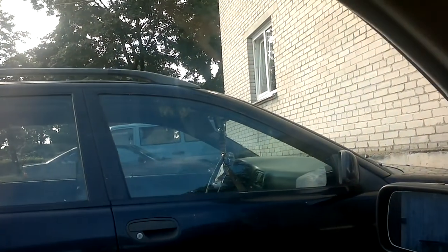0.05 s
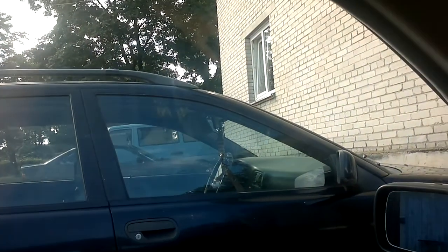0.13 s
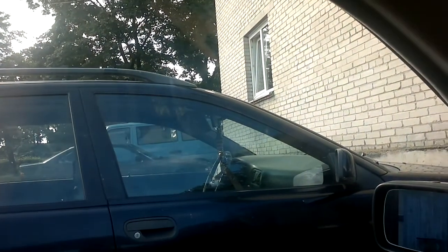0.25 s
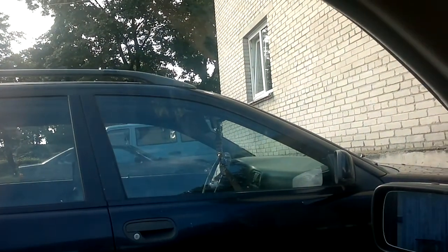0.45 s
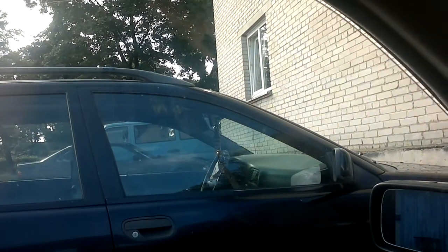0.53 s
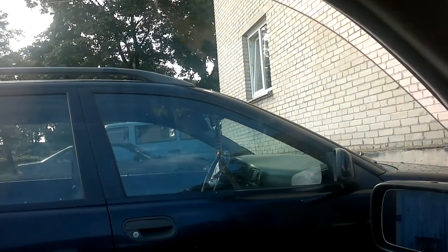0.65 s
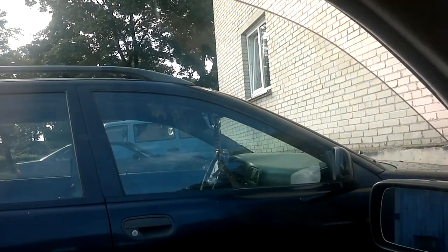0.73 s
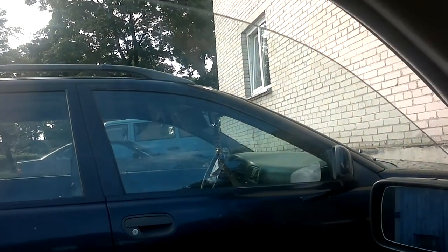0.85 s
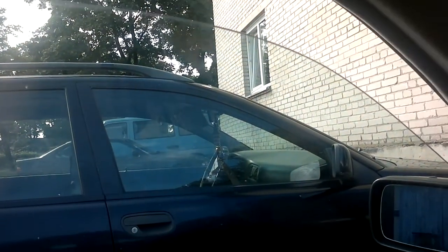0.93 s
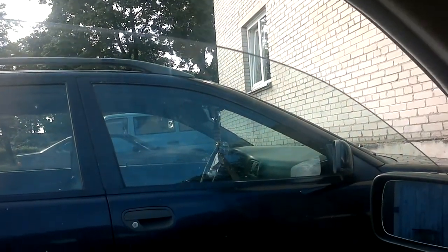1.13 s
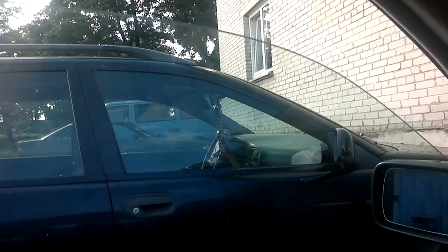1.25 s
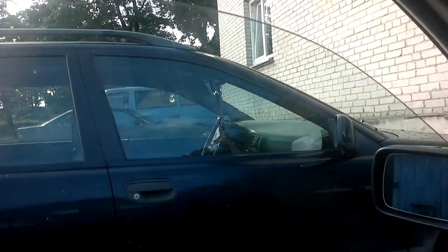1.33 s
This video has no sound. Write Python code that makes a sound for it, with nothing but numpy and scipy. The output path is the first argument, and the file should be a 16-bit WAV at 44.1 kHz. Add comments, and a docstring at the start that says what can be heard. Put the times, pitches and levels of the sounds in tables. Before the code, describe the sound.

A power window slides down, heard from the seat inside a parked car. A switch clicks at about 0.2 seconds, and at 0.3 the glass breaks loose from its rubber seal with a loud thunk. A small electric motor hums and whines steadily while the pane rubs along its channel. Just after 1 second it stops with a light knock and a brief door shudder, leaving faint outdoor background.

```python
"""A power window slides down, heard inside a parked car: a whir of shaft hum, commutator whine and gears,
with glass rubbing along its felt channel. A finger presses the switch, a relay clicks, the motor takes
up the slack and the pane cracks loose from its rubber seal with a thunk. The motor stops with a knock,
the door settles, and a quiet outdoor background remains."""
import sys
import numpy as np
from scipy import signal
from scipy.fft import rfft, irfft
from scipy.io import wavfile

SR = 44100
rng = np.random.default_rng(int(sys.argv[2]) if len(sys.argv) > 2 else 0)


def unload_audio(sound):
    """Save the sound as a 16-bit wav file, at the path given as the first command line argument."""
    columns = np.transpose(np.atleast_2d(sound))
    # keep every value between -1 and 1, then stretch to whole-number steps
    steps = np.round(np.clip(columns, -1, 1) * 32767)
    wavfile.write(sys.argv[1], SR, steps.astype(np.int16))


N = 61739


def undb(db):
    """Decibels to gain."""
    return 10 ** (np.asarray(db) / 20)


def clock():
    """Time of every sample in seconds."""
    return np.arange(N) / SR


def curve(rows):
    """Join (time_s, value) points by straight lines."""
    return np.interp(clock(), *np.array(rows).T)


def unit(x):
    """Scale to rms 1."""
    return x / np.sqrt(np.mean(x ** 2))


def noise(colour):
    """Noise of rms 1, shaped by (freq_hz, relative_db) points and rolled off below 20 Hz."""
    hz, db = np.array(colour).T
    f = np.arange(N // 2 + 1) * SR / N + 1
    gain = undb(np.interp(np.log(f), np.log(hz), db)) * np.minimum(f / 20, 1) ** 2
    return unit(irfft(rfft(rng.standard_normal(N)) * gain, N))


def drift(rate_hz):
    """Smooth random motion of rms 1, up to about the given rate."""
    f = np.arange(N // 2 + 1) * SR / N
    return unit(irfft(rfft(rng.standard_normal(N)) * np.exp(-(f / rate_hz) ** 2) * (f > 0), N))


def tone(turns):
    """Sine of rms 1 with a random starting phase."""
    return np.sqrt(2) * np.sin(2 * np.pi * (turns + rng.random()))


def waver(hz, wobble, rate_hz):
    """A tone whose pitch wanders by a share of itself."""
    return tone(np.cumsum(hz * (1 + wobble * drift(rate_hz))) / SR)


def fade(t60_s, hold_s=0):
    """Hold at full level, then decay exponentially."""
    return np.exp(-np.log(1000) * np.maximum(clock() - hold_s, 0) / t60_s)


def swell(rise_s, t60_s):
    """A smooth attack and an exponential decay."""
    return np.sin(np.pi / 2 * np.minimum(clock() / rise_s, 1)) ** 2 * fade(t60_s, hold_s=rise_s)


def at(start_s, x):
    """Delay a sound to its starting time."""
    return np.concatenate([np.zeros(int(start_s * SR)), x])[:N]


def strikes(hits, modes, tail_colour, tail_t60_s, tail_db):
    """Hits on one object: ringing modes and a noisy tail, duller for softer contact."""
    t, out = clock(), np.zeros(N)
    ring_rms = np.sqrt(sum(undb(db) ** 2 for _, db, _ in modes) / 2)
    for start_s, level_db, brightness_hz in hits:
        ring = np.zeros(N)
        for k, (hz, db, t60_s) in enumerate(modes):
            detuned_hz = hz * (1 + rng.standard_normal() / 100)
            ring += (-1) ** k * undb(db) * fade(t60_s) * np.sin(2 * np.pi * detuned_hz * t)
        tail = undb(tail_db) * noise(tail_colour) * fade(tail_t60_s)
        lowpass = signal.butter(2, min(brightness_hz, SR / 2 - 1), fs=SR, output="sos")
        out += undb(level_db) * at(start_s, signal.sosfilt(lowpass, ring / ring_rms + tail))
    return out


# Outdoor bed and the whistle's raspy edge: freq_hz, relative_db
AIR_COLOUR = [(15, -14.5), (25, 7), (164, -2), (410, -12.5), (782, -13), (848, -17.5), (1380, -13.5),
              (2170, -22.5), (2490, -25), (3630, -21), (15500, -30.5)]
RASP_COLOUR = [(1900, -35.5), (2380, -1), (2500, -1), (2700, -2.5), (3000, -31.5)]
# Fader ride on the whistle: time_s, level_db
WHISTLE_RIDE = [(0, -88), (.12, -83), (.16, -78), (1.13, -75), (1.22, -79.5), (1.3, -77.5), (1.35, -71.5),
                (1.4, -78.5)]

def outdoors():
    """A soft bed of rumble and hiss with a faint, raspy whistle."""
    whistle = waver(2445, wobble=0.0064, rate_hz=80) + undb(-2) * noise(RASP_COLOUR)
    return undb(-64) * noise(AIR_COLOUR) + undb(curve(WHISTLE_RIDE)) * whistle


# Finger, armrest and swaying door: start_s, level_db, pitch_hz, rise_s, t60_s
DOOR_THUMPS = [(.08, -37.5, 189.3, 0.014, 0.059), (.103, -40.5, 144.7, 0.0077, 0.097),
               (0.113, -37.5, 53, 0.017, 0.076), (0.23, -27.5, 118, 0.015, 0.17),
               (0.246, -28, 191, 0.0036, 0.048), (0.278, -18.5, 121.4, .02, 0.15),
               (0.283, -20.5, 56.2, 0.014, 0.13), (.296, -25, 189.7, 0.0052, .18),
               (0.367, -18.5, 113.1, 0.0085, 0.16), (0.371, -24, 187.9, 0.022, 0.18),
               (0.349, -29, 32.3, .07, 1), (0.487, -33, 131, 0.025, 0.28),
               (0.623, -39.5, 138.3, 0.0088, 0.42), (1.112, -39, 36.46, 0.027, 0.35),
               (1.124, -45.5, 128, 0.0083, 0.24)]

def door_thumps():
    """Each soft push swells one low resonance of the door, which then dies away."""
    t, out = clock(), np.zeros(N)
    for start_s, level_db, pitch_hz, rise_s, t60_s in DOOR_THUMPS:
        body = np.sqrt(2) * np.sin(2 * np.pi * pitch_hz * t)
        roughness = 0.64 * drift(pitch_hz / 2) * tone(pitch_hz * t)
        out += undb(level_db) * at(start_s, swell(rise_s, t60_s) * (body + roughness))
    return out


# Switch and relay clicks: start_s, level_db, brightness_hz
CLICKS = [(.184, -36.5, 12070), (.198, -42.5, 11990), (.2675, -35, 3500)]
# Their ring: pitch_hz, relative_db, t60_s
CLICK_MODES = [(596, -7.5, .11), (2607, -2, 0.05), (2645, 3.5, 0.13), (2678, 4, 0.059), (3168, -5.5, .05),
               (3878, -2, .035)]
# Their snap: freq_hz, relative_db
SNAP_COLOUR = [(300, -8), (1500, -25), (2700, 4), (4500, -9.5), (7000, -13.5), (10000, -20.5),
               (12500, -23.5), (16000, -36.5)]

def switch_and_relay():
    """Contacts snap over with a small, bright ring."""
    return strikes(CLICKS, CLICK_MODES, SNAP_COLOUR, tail_t60_s=0.1, tail_db=-3.5)


# Knocks on the door: start_s, level_db, brightness_hz
DOOR_KNOCKS = [(.073, -53, 800), (.088, -48.5, 920), (.229, -32.5, 700), (.246, -37.5, 683),
               (.266, -31, 798), (.2945, -17, 2400), (.2985, -15, 1500), (.312, -23.5, 850),
               (.338, -30.5, 2000), (.35, -25.5, 3000), (.392, -28, 1487), (.582, -37.5, 3000),
               (.695, -38, 2900), (.712, -46.5, 2430), (1.045, -37.5, 6000)]
# Panel ring: pitch_hz, relative_db, t60_s
DOOR_MODES = [(122.6, -5.5, 0.16), (187.5, 0, 0.36), (356.6, 0, 0.16), (439, -3.5, 0.084),
              (690, -12.5, 0.095), (806.5, -7.5, 0.071), (1001, -11.5, 0.075), (1064.4, -6.5, 0.1),
              (1150, -7, .06), (1285, -9, 0.12), (1557, -10.5, 0.092), (1915, -11.5, .07)]
# Panel rattle: freq_hz, relative_db
RATTLE_COLOUR = [(30, -6), (170, 2), (400, 0.5), (600, -2.5), (1200, -13.5), (1500, -12.5), (2500, -23.5),
                 (5000, -19), (8000, -50), (12000, -56)]

def door_knocks():
    """The hand at the switch, then the pane and its lifter, set the door panels ringing and rattling."""
    return strikes(DOOR_KNOCKS, DOOR_MODES, RATTLE_COLOUR, tail_t60_s=0.11, tail_db=0)


# Gearbox clacks: start_s, level_db, brightness_hz
GEARBOX_CLACKS = [(1.051, -35, 4200), (1.058, -48, 4000), (1.067, -35, 1260)]
# Gearbox ring: pitch_hz, relative_db, t60_s
GEARBOX_MODES = [(551, -8, 0.078), (670, -8.5, .06), (1700, -14, 0.024), (1804, -12.5, 0.058),
                 (2070, -20, 0.053), (4510, -25, .04)]
# Low shudder of the door: freq_hz, relative_db
SHUDDER_COLOUR = [(30, -1), (80, -1), (130, 1.5), (200, 1.5), (270, -17.5), (550, -18.5), (900, -49),
                  (2000, -55), (8000, -75)]

def motor_stop():
    """The gearbox clacks, rattling the door, which shudders as the pane comes to rest."""
    clacks = strikes(GEARBOX_CLACKS, GEARBOX_MODES, RATTLE_COLOUR, tail_t60_s=0.075, tail_db=-4)
    shudder = noise(SHUDDER_COLOUR) * swell(rise_s=0.017, t60_s=0.18)
    return clacks + undb(-34.5) * at(1.09, shudder)


# Glass slipping in the seal: start_s, level_db, pitch_hz, squeak_relative_db
SEAL_SLIPS = [(.22, -49, 5270, 1.5), (0.2687, -40, 2490, 6.5), (.2705, -34, 2356, 4),
              (0.275, -37, 1974, -7), (0.276, -35, 1315, -1.5), (.283, -39, 4890, 1.5),
              (0.299, -36, 1900, -8.5), (0.307, -32, 3060, -15), (.391, -37, 2370, -2),
              (.404, -39.5, 1960, -6.5), (.6935, -45.5, 2610, 1)]
# Crack of each slip: freq_hz, relative_db
CRACK_COLOUR = [(300, 1.5), (1200, 0.5), (2500, -1.5), (3300, -5), (5000, -8), (6300, -14.5), (7600, -17.5),
                (9500, -25), (11500, -44.5), (15000, -54.5)]

def seal_slips():
    """Each slip of glass on rubber is a crack with a short, unsteady squeak in it."""
    out, rise_s = np.zeros(N), 0.0005
    for start_s, level_db, pitch_hz, squeak_db in SEAL_SLIPS:
        squeak = waver(pitch_hz, wobble=0.048, rate_hz=410) * swell(rise_s, t60_s=0.061)
        crack = noise(CRACK_COLOUR) * swell(rise_s, t60_s=0.085)
        out += undb(level_db) * at(start_s, crack + undb(squeak_db) * squeak)
    return out


# Glass on felt: freq_hz, relative_db
RUB_COLOUR = [(300, -4.5), (1200, -0.5), (2500, -1), (3700, 1.5), (5200, -2), (6200, -8.5), (7800, -10),
              (10000, -23.5), (12500, -39), (16000, -36.5)]
# Fader ride on the rub: time_s, level_db
RUB_RIDE = [(.385, -61), (.4, -52), (.45, -48.5), (.51, -56), (.58, -52.5), (.74, -55), (.85, -56.5),
            (1.07, -56)]

def sliding_pane(turns):
    """The pane rubs its channel, pulsing once a shaft turn; its edge leaves the seal with a short hiss."""
    peel_s, peel_width_s, peel_hz = 0.46, 0.035, 6940
    rub = noise(RUB_COLOUR) * undb(curve(RUB_RIDE)) * (1 + 0.11 * np.cos(2 * np.pi * turns))
    hiss = noise([(peel_hz / 2, -25), (peel_hz, 0), (peel_hz * 2, -40)])
    peel = np.exp(-((clock() - peel_s) / peel_width_s) ** 2 / 2)
    return rub + undb(-61) * hiss * peel


# Shaft hum and commutator whine: shaft_harmonic, level_db
HUM_PARTIALS = [(1, -37.5), (2, -45), (3, -49.5), (4, -68.5), (5, -60), (6, -70.5), (7, -59), (8, -58.5)]
WHINE_PARTIALS = [(10, -66), (11, -62.5), (12, -52), (13, -55.5), (14, -57), (16, -61.5), (17, -66),
                  (23, -69.5), (24, -60), (25, -71.5), (26, -71), (32, -69.5), (33, -72), (36, -69)]
# Gear grind: freq_hz, relative_db
GEAR_COLOUR = [(40, -1.5), (90, -6), (135, 0.5), (260, -7), (550, -11.5), (720, -23.5), (1050, -20),
               (1450, -25), (1850, -24.5), (2150, -26), (2550, -27.5), (3100, -43.5), (8000, -69.5)]
# Fader rides on the whine and on the gears, which follow the load: time_s, gain_db
WHINE_RIDE = [(.38, -4), (.46, 0.5), (.54, -3), (.72, -3), (.82, 3), (.92, 0), (1.06, -2.5)]
GEAR_RIDE = [(.4, 4.5), (.52, -2.5), (.7, 0.5), (.78, 0), (.9, -2.5), (.98, 1.5), (1.07, -0.5)]
FLUTTER_HZ = 44.7

def motor(turns):
    """The shaft pushes the door once a turn; the commutator's whine flutters; the gears grind in step."""
    hum = sum(undb(db) * np.sqrt(2) * np.cos(2 * np.pi * k * turns) for k, db in HUM_PARTIALS)
    whine = sum(undb(db) * tone(k * turns) * (1 + 0.25 * drift(FLUTTER_HZ)) for k, db in WHINE_PARTIALS)
    gears = noise(GEAR_COLOUR) * (1 + 0.19 * np.cos(2 * np.pi * turns))
    return hum + whine * undb(curve(WHINE_RIDE)) + gears * undb(-40 + curve(GEAR_RIDE))


# The shaft spins up, holds and slows: time_s, speed_hz
SHAFT_SPEED = [(.23, 35), (.31, 60), (.4, 69.7), (.442, 71.9), (.52, 74.4), (.6, 75), (.74, 75),
               (.83, 75.6), (.99, 75), (1.07, 74.8), (1.13, 50)]

def power_window():
    """One slightly fluttering shaft drives motor and pane, which fade in and out together."""
    on_s, rise_s, off_s = 0.22, 0.033, 1.07
    speed_hz = curve(SHAFT_SPEED) * (1 + 0.0035 * drift(FLUTTER_HZ))
    turns = np.cumsum(speed_hz) / SR
    running = np.clip((clock() - on_s) / rise_s, 0, 1) * fade(t60_s=0.081, hold_s=off_s)
    return running * (motor(turns) + sliding_pane(turns))


def scene():
    """Window, switch and door over the outdoor bed, heard in mono from the seat."""
    mix = power_window() + switch_and_relay() + door_knocks() + seal_slips()
    return (mix + door_thumps() + motor_stop() + outdoors())[None]


def record(dry):
    """A steep high cut takes off the very top."""
    cutoff_hz = 15750
    return signal.sosfilt(signal.ellip(10, .2, 80, cutoff_hz, fs=SR, output="sos"), dry)


dry = scene()
out = record(dry)
unload_audio(out)
```